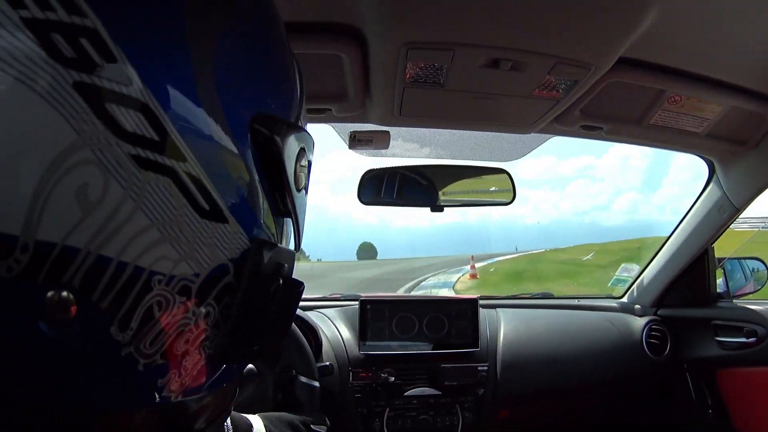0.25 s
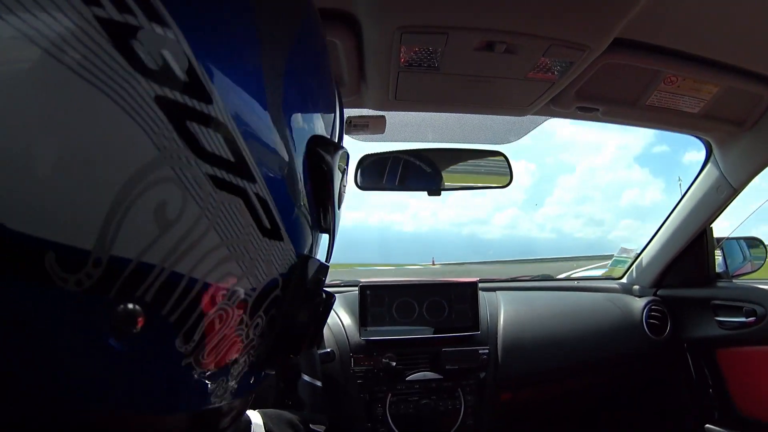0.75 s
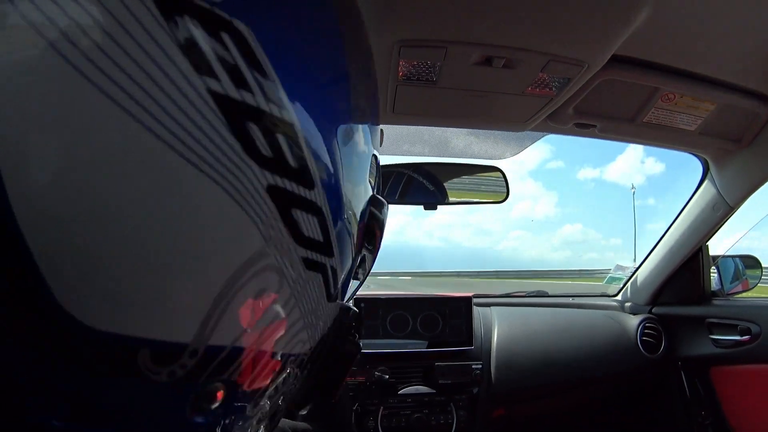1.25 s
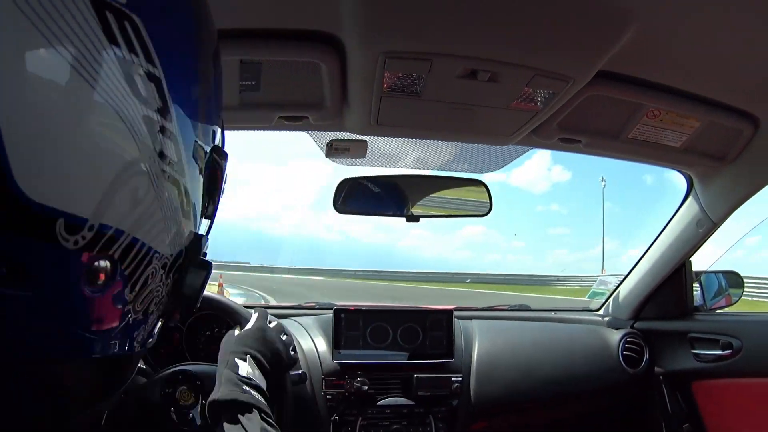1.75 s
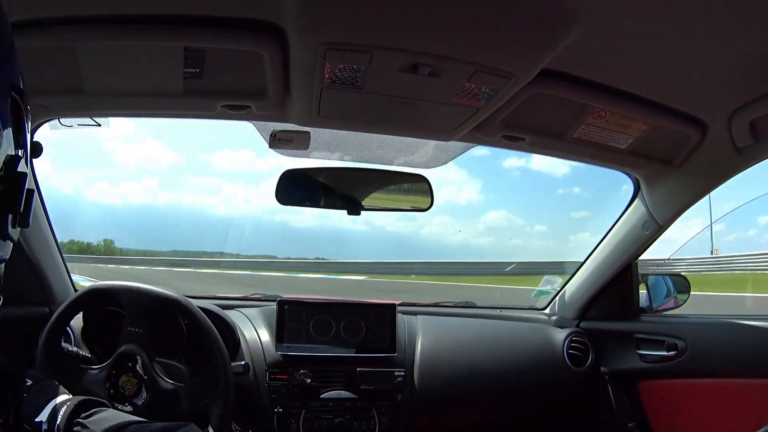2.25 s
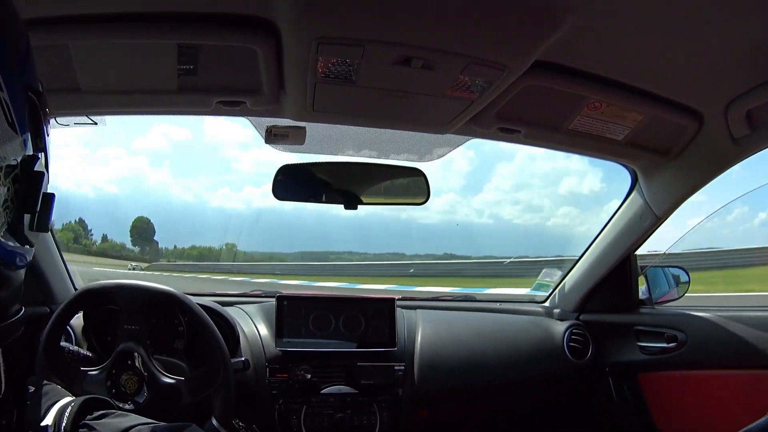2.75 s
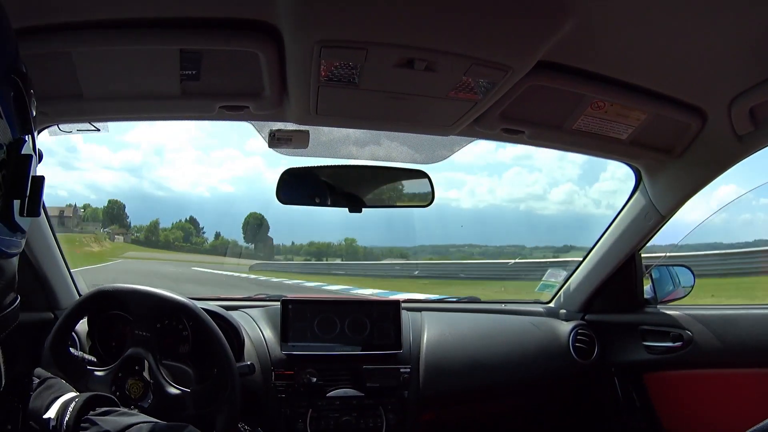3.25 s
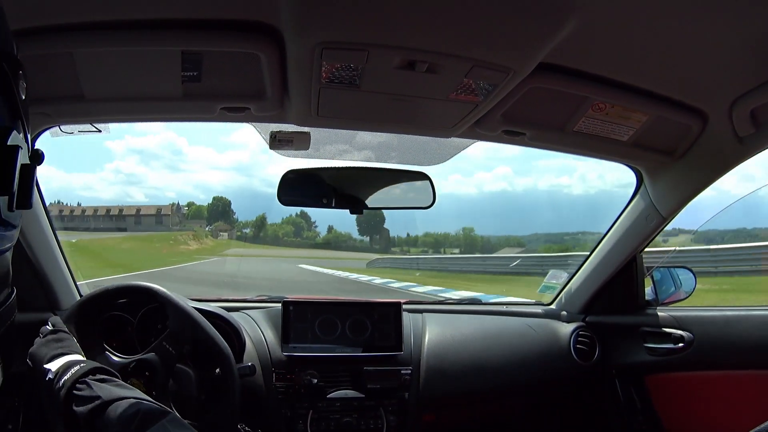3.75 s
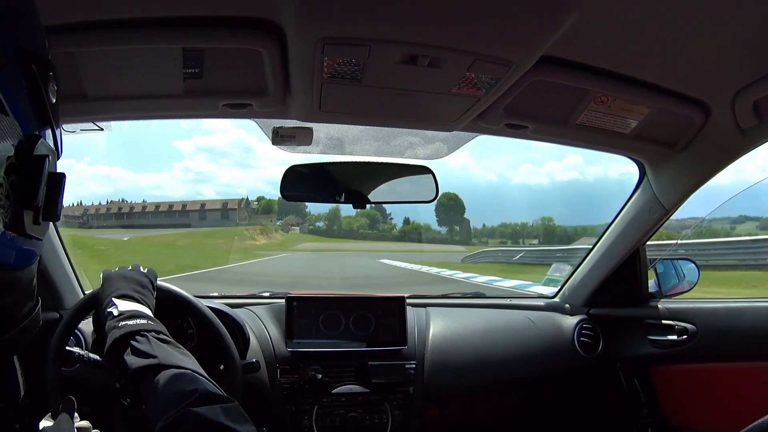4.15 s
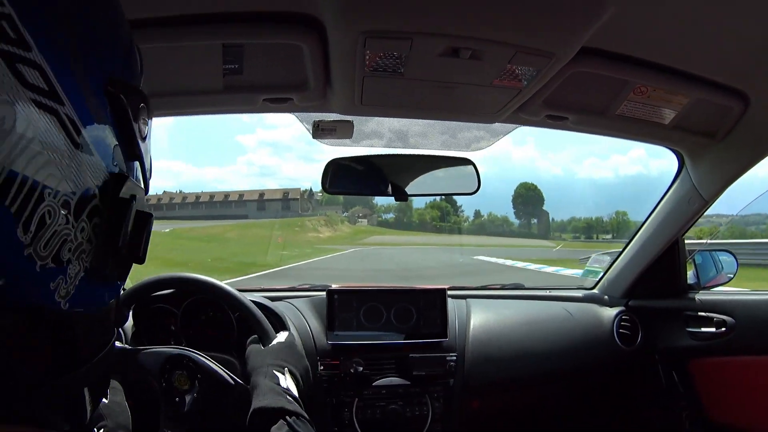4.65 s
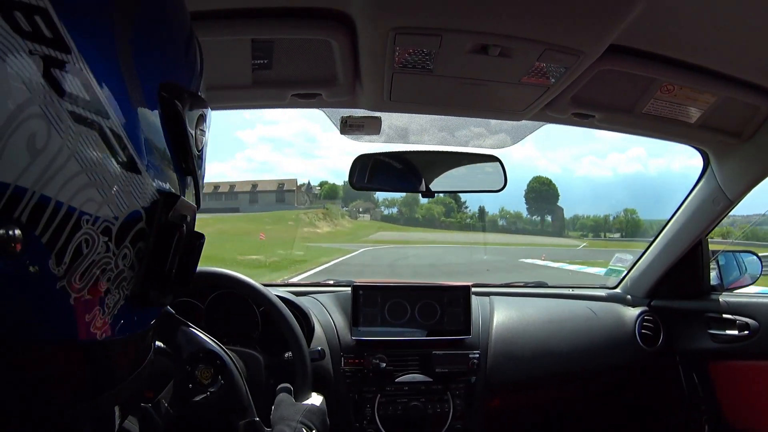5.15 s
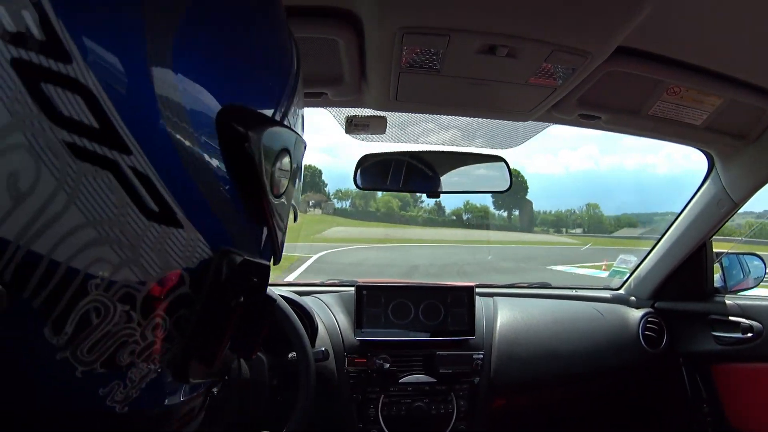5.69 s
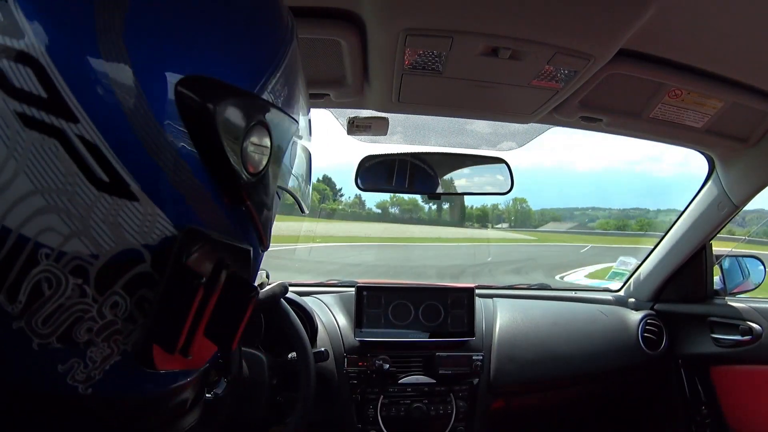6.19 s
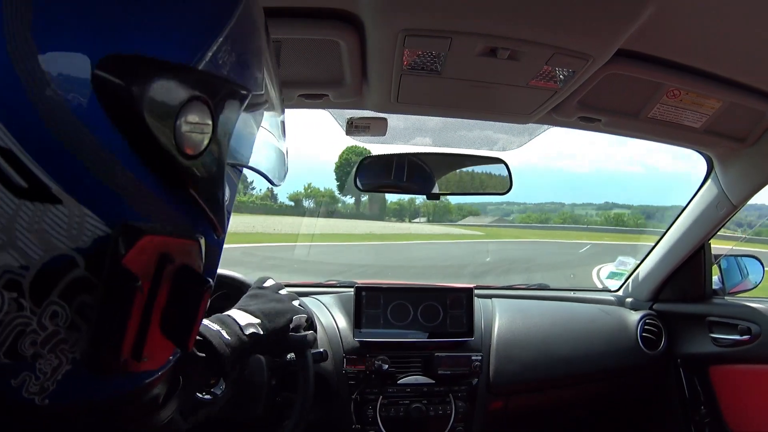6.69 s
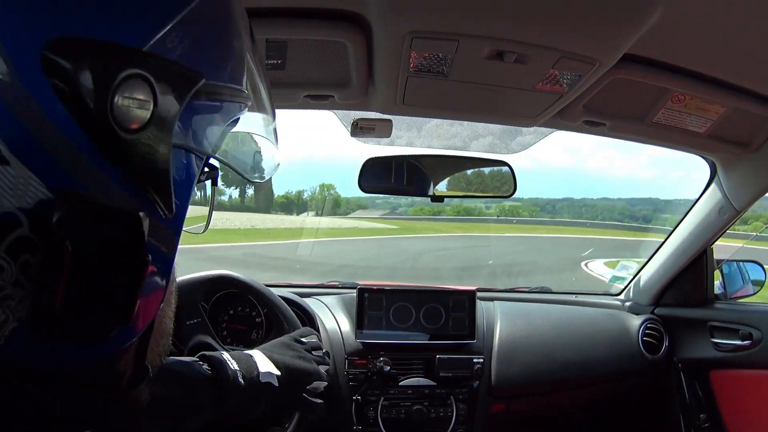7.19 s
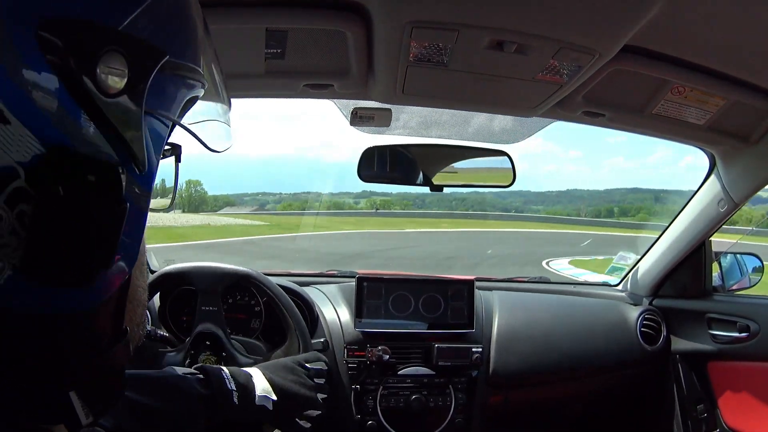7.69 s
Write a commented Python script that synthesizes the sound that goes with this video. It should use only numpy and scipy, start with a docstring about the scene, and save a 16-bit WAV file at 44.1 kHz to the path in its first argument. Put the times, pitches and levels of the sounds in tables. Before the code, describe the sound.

Close, dark cabin sound of a car on a race track. A low buzzing rotary engine sags slightly, then pulls steadily upward over body rumble and tyre roar. Plastic trim clacks and a small metal ring tinkles, mostly around two to three seconds. Just past five seconds the driver lifts: clunks, a shudder and a puff of air, then quieter, falling engine drone with road noise and faint ringing.

```python
"""Cabin of a turbocharged rotary car on a race track: it pulls up through a bend, lifts off and runs down.
Firing boom, lope, overtones and whines are fluttering lines locked to one shaft angle; rasp is pulsed noise.
Body rumble, tyre roar, drivetrain drone and rushing air are coloured noise and lines with timed levels.
Trim knocks, ring taps and drivetrain clunks are decaying bursts and modes; a faint hum climbs late.
Draughts buffet the microphone ports; limiters hold the peaks."""
import sys
import numpy as np
from scipy import signal
from scipy.fft import rfft, irfft, next_fast_len
from scipy.io import wavfile
from scipy.ndimage import uniform_filter1d, minimum_filter1d, map_coordinates

SR = 44100
rng = np.random.default_rng(int(sys.argv[2]) if len(sys.argv) > 2 else 0)


def generate_wav(signal):
    """Clip the signal to [-1, 1] and save it as 16-bit WAV at the path in sys.argv[1]."""
    frames = np.transpose(np.atleast_2d(signal))
    scaled = np.clip(frames, -1, 1) * 32767
    pcm = np.round(scaled).astype(np.int16)
    wavfile.write(sys.argv[1], SR, pcm)


N = 349713
# all table levels are relative: later gains and the limiters still act


def amp(db):
    """Decibels to gain."""
    return 10 ** (np.asarray(db) / 20)


def unit(x):
    """Scaled to rms 1."""
    return x / np.sqrt(np.mean(x ** 2) + 1e-20)


def along(points, hz):
    """(freq_hz, value) points read on a log frequency axis."""
    point_hz, value = np.transpose(points)
    return np.interp(np.log(hz + 1), np.log(point_hz + 1), value)


def curves(rows):
    """One value per sample for each column after time_s; end values hold."""
    time_s, *columns = np.transpose(rows)
    return [np.interp(np.arange(N) / SR, time_s, column) for column in columns]


def wobble(knots_per_s):
    """Smooth random curve."""
    knots = rng.standard_normal(int(N * knots_per_s / SR) + 4)
    return map_coordinates(knots, [np.arange(N) * knots_per_s / SR])


def filtered(x, response):
    """x shaped by a response of frequency, zero-padded against wrap-around."""
    n = x.shape[-1]
    padded = next_fast_len(n + 8192)
    hz = np.fft.rfftfreq(padded, 1 / SR)
    return irfft(rfft(x, padded) * response(hz), padded)[..., :n]


def coloured(x, spectrum):
    """x given a table's spectrum, rms 1."""
    return unit(filtered(x, lambda hz: amp(along(spectrum, hz))))


def noise(spectrum):
    """Mono coloured noise, rms 1."""
    return coloured(rng.standard_normal(N), spectrum)


# stereo width of the noises: freq_hz, side_minus_mid_db
STEREO_WIDTH = [(130, -15), (200, -11.5), (300, -13.5), (450, -11), (670, -10), (1000, -7), (1500, -6),
                (2240, -5.5), (3340, -9.5), (5000, -11.5), (7500, -14), (11200, -16)]


def diffuse(spectrum, ripple_db=1.32, ripple_hz=45):
    """Stereo noise, mid at rms 1; reflections from the glass ripple its colour."""
    def ripple(hz):
        knots = rng.standard_normal(2048)
        depth_db = ripple_db * np.minimum(hz / 1000, 1)
        return depth_db * map_coordinates(knots, [hz / ripple_hz], mode="mirror")

    def colour(hz):
        mid_db = along(spectrum, hz) + ripple(hz)
        side_db = along(spectrum, hz) + along(STEREO_WIDTH, hz) + ripple(hz)
        return amp([mid_db, side_db])

    mid, side = filtered(rng.standard_normal((2, N)), colour)
    return np.array([mid + side, mid - side]) / np.std(mid)


def panned(left_minus_right_db):
    """Left and right gains."""
    return amp([[left_minus_right_db / 2], [-left_minus_right_db / 2]])


def add(track, start_s, sound):
    """Mixes a sound in at start_s, or at 0 if that is negative."""
    start = max(round(start_s * SR), 0)
    track[..., start:start + sound.shape[-1]] += sound[..., :N - start]


def partial(phase, rough, flutter_rate, spread):
    """Stereo line, rms 1: shared flutter (knots/s) plus a share opposed between the ports."""
    shared = 1 + rough * (wobble(flutter_rate) + 1j * wobble(flutter_rate))
    apart = spread * (wobble(3.044) + 1j * wobble(3.3))
    return unit((np.array([shared + apart, shared - apart]) * np.exp(1j * phase)).real)


def resonance(hz, centre_hz, width_hz):
    """Response of one mode, 1 at its centre."""
    return 1j * hz * width_hz / (centre_hz ** 2 - hz ** 2 + 1j * hz * width_hz)


def body(modes):
    """Response of a set of modes: each squared resonance magnitude, scaled and summed."""
    return lambda hz: sum(amp(db) * np.abs(resonance(hz, centre_hz, width_hz)) ** 2
                          for centre_hz, width_hz, db in modes)


def by_throttle(table, hz, throttle):
    """Gains under power and on the overrun, crossfaded by throttle."""
    row_hz, power_db, overrun_db = np.transpose(table)
    power = throttle * amp(np.interp(hz, row_hz, power_db))
    overrun = (1 - throttle) * amp(np.interp(hz, row_hz, overrun_db))
    return power, overrun


# engine speed: time_s, firing_hz
ENGINE_SPEED = [(0, 140.4), (.2, 135.5), (.55, 129.4), (1.0, 128.6), (1.25, 125.5), (2.0, 125.4),
                (2.3, 127.5), (2.7, 127.3), (3.1, 129.6), (3.5, 132.4), (4.0, 137.7), (4.5, 143.1),
                (4.9, 151.6), (5.2, 154.2), (5.6, 146.3), (6.15, 133.9), (6.5, 128.6), (7.4, 123.4)]


def engine_speed():
    """Firing rate in Hz with a slight random unsteadiness."""
    return curves(ENGINE_SPEED)[0] * (1 + .0015 * wobble(12))


# driver feeds in power, floors it, eases, lifts, picks it up again: time_s, throttle (0-1)
PEDAL = [(.6, 0.15), (.85, 0.4), (1.02, 0.77), (2.5, 0.82), (2.66, 0.69), (2.78, 0.91), (4.85, 0.98),
         (5.25, 0.64), (5.4, 0.03), (7.25, 0), (7.45, 0.45), (7.65, 0.8)]


def pedal():
    """Throttle opening per sample."""
    return curves(PEDAL)[0]


# cabin boom, strongest at low firing rates: firing_hz, power_db, overrun_db
CABIN_BOOM = [(123.2, -18, -21), (126, -16, -17), (130.1, -14.5, -20.5), (136.3, -16, -23),
              (143.3, -22.5, -36.5), (156.1, -30, -49)]


def firing_boom(turn, firing_hz, throttle):
    """Combustion pushes where the overrun sucks, so the boom cancels as the throttle passes between."""
    push, suck = by_throttle(CABIN_BOOM, firing_hz, throttle)
    return (push - suck) * partial(turn, rough=0.069, flutter_rate=30, spread=.05) * panned(-0.97)


# uneven firing: firing_hz, power_db, overrun_db
UNEVEN_FIRING = [(119.2, -33, -21.5), (131, -44.5, -25), (143.5, -46, -38.5)]


def lope(turn, firing_hz, throttle):
    """Rotors fire unevenly, chiefly on the overrun: a line at half the firing rate."""
    gain = sum(by_throttle(UNEVEN_FIRING, firing_hz, throttle))
    return gain * partial(turn / 2, rough=.3, flutter_rate=10, spread=.15)


# two rotors fire in turn, unequally, so half orders sound: firing_multiple, level_db
EXHAUST_ORDERS = [(.5, 4.5), (1.5, -9), (2, 5.5), (2.5, 1.5), (3, 3.5), (3.5, 3.5), (4, 2), (4.5, -3),
                  (5, -12.5), (5.5, -6), (6, -16.5), (6.5, -6.5), (7, -8.5), (7.5, -16.5), (8.5, -10.5),
                  (10, -8.5), (11, -12.5)]
# overtones the cabin favours as they pass: freq_hz, gain_db
CABIN_RESPONSE = [(250, 4), (295, 4), (325, -11), (360, 4.5), (385, 0.5), (420, 2.5), (440, -7.5),
                  (465, 1.5), (495, -3.5), (518, -1.5), (535, -4), (562, -1), (582, 4.5), (602, 0),
                  (620, -11.5), (650, -8), (730, 2), (800, -9), (890, -2.5), (1100, -6)]


def exhaust_overtones(turn, throttle, open_db=-25.5, shut_db=-38.5, load_power=2.2):
    """Firing orders through the cabin response; they open up chiefly near full throttle."""
    orders = sum(amp(db) * partial(multiple * turn, rough=0.21, flutter_rate=22, spread=0.26)
                 for multiple, db in EXHAUST_ORDERS)
    level_db = shut_db + throttle ** load_power * (open_db - shut_db)
    return amp(level_db) * coloured(orders, CABIN_RESPONSE)


# gear level, shaped by a cabin standing wave: whine_hz, power_db, overrun_db
GEAR_WHINE = [(199, -33.5, -28.5), (208.3, -44.5, -33), (223.2, -31.5, -26.5), (230.3, -22, -22),
              (239.3, -21, -25), (248, -27.5, -31)]


def gear_whine(turn, firing_hz, throttle, firing_multiple=1.62):
    """A gear sings at a fixed multiple of the firing rate."""
    gain = sum(by_throttle(GEAR_WHINE, firing_multiple * firing_hz, throttle))
    return gain * partial(firing_multiple * turn, rough=0.25, flutter_rate=28, spread=0.14)


def pulley_whine(turn, firing_multiple=1.845, level_db=-33):
    """A pulley stands out as it meets a narrow standing wave of the cabin."""
    line = partial(firing_multiple * turn, rough=0.62, flutter_rate=10, spread=0.23)
    return amp(level_db) * unit(filtered(line, lambda hz: resonance(hz, 230.95, 8.5)))


# rasp level: time_s, level_db
RASP_LEVEL = [(0, -53), (.55, -56.5), (2.7, -61), (4.1, -52), (4.6, -47.5), (5.0, -49), (5.28, -42.5),
              (5.34, -50), (5.8, -42.5), (6.3, -71)]
# rasp colour: freq_hz, density_db
RASP_COLOUR = [(500, -29.5), (1000, -5), (1350, 2.5), (1650, -4.5), (2100, -3.5), (3000, -9), (4500, -16.5),
               (8000, -44)]


def exhaust_rasp(turn):
    """Turbulent gas leaves the ports, surging with the firings and at half their rate."""
    bursts = 1 + 0.26 * np.cos(turn) + 0.23 * np.cos(turn / 2)
    return amp(curves(RASP_LEVEL)[0]) * bursts * diffuse(RASP_COLOUR)


def damped(shake, window_s=.045, damping=.6):
    """Dampers press down the swells of the shaking; lowpassed, mid at rms 1."""
    power = np.abs(uniform_filter1d(np.mean(shake ** 2, axis=0), int(window_s * SR)))
    pressed = shake / (power + 1e-9) ** (damping / 2)
    even = filtered(pressed, lambda hz: 1 / (1 + (hz / 220) ** 8))
    return even / np.std(even.mean(axis=0))


# body shake level: time_s, level_db
SHAKE_LEVEL = [(.42, -20.5), (.56, -15.5), (.9, -15.5), (1.05, -18.5), (1.45, -21.5), (2.25, -20.5),
               (2.45, -14), (2.62, -18.5), (2.75, -22), (3.5, -23.5), (4.0, -20), (4.7, -19.5), (5.3, -17),
               (6.0, -16.5), (6.7, -18.5), (7.93, -15.5)]
# in-phase shake colour: freq_hz, density_db
RUMBLE_COLOUR = [(10, -14), (20, -3), (28, -1.5), (38, 0.5), (50, -6), (62, -7), (78, -9.5), (100, -11),
                 (125, -14.5), (170, -32.5), (300, -83)]
# left-right opposed shake colour: freq_hz, density_db
SWAY_COLOUR = [(15, -17), (30, -12), (50, 5), (65, 14), (80, 4), (95, 6.5), (125, -3.5), (170, -19),
               (300, -76.5)]


def body_rumble():
    """The body shakes: low noise in phase plus a sway opposed left to right."""
    sway = amp(-7) * noise(SWAY_COLOUR) * [[1], [-1]]
    level_db = curves(SHAKE_LEVEL)[0] + .6 * wobble(6.6)
    return amp(level_db) * damped(noise(RUMBLE_COLOUR) + sway)


# tyre roar level, which the rushing air follows: time_s, level_db
ROAD_LEVEL = [(0, -28.5), (.5, -27.5), (.62, -29), (1.0, -29), (1.85, -30.5), (2.05, -27), (2.45, -23.5),
              (2.66, -31), (2.85, -25.5), (3.5, -26.5), (4.6, -27), (5.3, -26), (5.55, -24), (5.83, -22.5),
              (6.3, -23.5), (7.93, -22.5)]
# tyre roar colour: freq_hz, density_db
TYRE_COLOUR = [(70, -31.5), (130, -1), (175, 2), (205, -0.5), (232, 5), (266, -5), (305, -1.5), (350, -7.5),
               (420, -9.5), (520, -12), (610, -14), (680, -13.5), (755, -11), (810, -16), (890, -13.5),
               (1050, -20.5), (1500, -26.5), (2200, -36.5), (4000, -45), (9000, -67.5)]


def tyre_roar():
    """Tyres roar over the asphalt: diffuse noise with a fluctuating level."""
    level_db = curves(ROAD_LEVEL)[0] + 0.44 * wobble(25)
    return amp(level_db) * diffuse(TYRE_COLOUR) * panned(0.88)


# drone level: time_s, level_db
DRONE_LEVELS = [(0, -29), (.48, -35.5), (.72, -41), (.95, -38.5), (1.15, -38), (1.68, -34), (1.84, -53),
                (2.02, -35.5), (2.45, -46), (3.6, -36.5), (4.35, -35), (4.62, -49), (5.0, -36),
                (5.5, -32.5), (6.2, -26.5), (6.6, -30), (7.35, -28.5), (7.77, -33), (7.93, -23.5)]
# drone colour: freq_hz, density_db
DRONE_COLOUR = [(200, -57.5), (360, -6.5), (410, 2), (480, 2), (510, -5), (560, -17.5), (900, -63.5)]
# droning shafts: firing_multiple, level_db
DRONE_SHAFTS = [(3.35, -5), (3.72, -0.5), (3.88, 0)]


def drivetrain_drone(turn):
    """Drivetrain shafts drone as rough lines, blended with noise of the same colour."""
    shafts = sum(amp(db) * partial(multiple * turn, rough=0.53, flutter_rate=15, spread=0.62)
                 for multiple, db in DRONE_SHAFTS)
    blend = coloured(shafts, DRONE_COLOUR) + 0.68 * diffuse(DRONE_COLOUR)
    return amp(curves(DRONE_LEVELS)[0]) * blend * panned(1.1)


# rushing air colour: freq_hz, density_db
AIR_COLOUR = [(600, -14), (1400, 8.5), (2200, 3.5), (2900, 2), (3400, -1.5), (4200, 0), (5400, -3),
              (6300, -8), (7500, -14.5), (9500, -14.5), (11200, -18.5)]


def rushing_air(turn, below_tyres_db=21, swell_s=2.02, swell_width_s=0.34, swell_db=3):
    """Air hiss follows the road level, swells once and pulses with the firings."""
    swell = np.exp(-((np.arange(N) / SR - swell_s) / swell_width_s) ** 2)
    level_db = curves(ROAD_LEVEL)[0] - below_tyres_db + swell_db * swell + 0.56 * wobble(40)
    pulsing = 1 + 0.058 * np.cos(turn) + 0.061 * np.cos(turn / 2)
    return amp(level_db) * pulsing * diffuse(AIR_COLOUR) * panned(0.99)


# loose trim knocks, and at 4.348 s a sharp click as a draught strikes: start_s, level_db, knock_db, centre_hz,
# left_minus_right_db, note_hz, note_db
TRIM_KNOCKS = [(0.0223, -29, -1, 3142, 1, 3000, -13), (0.317, -22.5, -5, 3160, 2.5, 3020, -14),
               (0.919, -31, 6, 2534, 0, 2500, -8), (1.0994, -25, -3, 2800, 0.5, 2260, -10),
               (1.7554, -24, -1, 2800, 1, 2740, -7), (1.9917, -31, -9, 3600, 1.5, 4000, -10),
               (2.1452, -16.5, 2, 3200, -3, 3060, -7), (2.206, -19, 6.5, 2900, -2, 700, 6),
               (2.2585, -22.5, -6, 4200, -3, 3990, -3), (2.443, -34, -4, 3000, 0, 2260, -4),
               (2.625, -30.5, -1, 3497, 0, 3030, -9), (4.348, -22.5, 3, 2880, 0, 2240, -12),
               (6.9727, -34, 10, 2393, 0, 698.6, 10)]
# panel modes: centre_hz, width_hz, level_db
PANEL_MODES = [(710, 150, 6.5), (1130, 670, -2), (2100, 870, -2.5), (3220, 470, -6.5), (4050, 190, -0.5),
               (5000, 400, -0.5), (5820, 580, -0.5), (6400, 480, -3.5), (9200, 3500, -3.5)]


def trim_knocks(octaves=0.68, t60_s=.042, note_t60_s=.07, attack_s=.0006, bounce_s=.005):
    """Plastic panels strike and bounce once: bright clack, duller knock and the panel's own note; the click at
    4.348 s is played the same way."""
    out, t = np.zeros((2, N)), np.arange(SR // 8) / SR

    def strike(t, t60_s):
        return amp(-60 * t / t60_s) * (1 - np.exp(-t / attack_s))

    fade = strike(t, t60_s) + 0.23 * strike(np.maximum(t - bounce_s, 0), t60_s)
    for start_s, db, knock_db, centre_hz, pan_db, note_hz, note_db in TRIM_KNOCKS:
        blow = rng.standard_normal(len(t)) + 0.64 * rng.standard_normal((2, len(t)))
        burst = filtered(blow, body(PANEL_MODES))
        clack = unit(filtered(burst, lambda hz: 1 / (1 + (np.log2((hz + 1) / centre_hz) / octaves) ** 2)))
        knock = unit(filtered(burst, lambda hz: 1 / (1 + (hz / 1100) ** 3)))
        note = amp(db + note_db) * strike(t, note_t60_s) * np.sin(2 * np.pi * note_hz * t)
        hit = fade * (amp(db - 3) * clack + amp(db + knock_db - 1.5) * knock)
        add(out, start_s, panned(pan_db) * (hit + note))
    return out


# puffs on the microphone ports: start_s, length_s, level_db
DRAUGHT_PUFFS = [(0.217, 0.017, -7.5), (4.347, 0.015, 1), (4.352, 0.064, -8), (4.934, 0.031, -1),
                 (5.343, 0.062, -14), (5.456, 0.044, 6), (5.492, 0.038, 1)]
# buffeting colour: freq_hz, density_db
BUFFET_COLOUR = [(30, -4), (100, -2.5), (200, -1), (450, -9), (700, -17.5), (1200, -30), (2200, -41),
                 (3500, -53), (8000, -78)]


def draughts():
    """Short puffs of air push the two ports in opposite directions."""
    push = np.zeros(N)
    for start_s, length_s, db in DRAUGHT_PUFFS:
        add(push, start_s, amp(db) * signal.windows.tukey(max(int(length_s * SR), 2), .5))
    return amp(0.5) * push * noise(BUFFET_COLOUR) * [[1], [-1]]


# clear taps on the ring: start_s, level_db, ring_share (of the free t60)
RING_TAPS = [(0.391, -38.5, 0.69), (1.3064, -46, .9), (1.9571, -36, .6), (2.015, -36, 1),
             (2.0688, -33.5, .9), (2.1989, -33, 1.3), (2.236, -27.5, 1), (2.42, -38, .9),
             (2.4615, -37, 1.58), (2.6282, -22, .8), (2.736, -34.5, .9), (2.8913, -41, .9),
             (2.93, -21.5, 0.91), (3.01, -43, 1), (3.047, -44, 0.84), (4.5574, -36.5, 0.91),
             (4.605, -46, 0.71), (5.0469, -34, 0.99), (5.0855, -36, 0.72), (5.2445, -38, .5),
             (5.6665, -38, 0.63), (5.69, -32, 1.1), (5.7894, -34, 0.53), (5.9148, -34, 0.32),
             (5.953, -34, 1.2), (6.261, -26.5, 0.77), (6.4128, -39, 0.44), (6.7263, -37, .35),
             (6.794, -34, .9), (7.155, -42.5, 1.1)]
# spells of faint trembling: start_s, end_s
TREMBLE_SPELLS = [(1.8, 3.1), (4.55, 5.25), (5.6, 7.2)]


def ring_contacts(light_share=0.52, count=2, flight_s=0.022, loss_db=15,
                  gap_s=0.09, faint_db=-50, scatter_db=1):
    """(start_s, level_db, ring_share) of clear taps, weaker chatter after each, and uneven faint touches."""
    contacts = list(RING_TAPS)
    for start_s, db, _ in RING_TAPS:
        for k in range(count):
            later_s = start_s + flight_s * (k + rng.uniform(0.34, 1))
            contacts.append((later_s, db - loss_db * (k + 1), light_share))
    for spell_start_s, spell_end_s in TREMBLE_SPELLS:
        for slot_s in np.arange(spell_start_s, spell_end_s, gap_s):
            touch_s = slot_s + gap_s * rng.uniform(-1, 1)
            contacts.append((touch_s, faint_db + scatter_db * rng.standard_normal(), light_share))
    return contacts


# ring modes: freq_hz, level_db, t60_s (free)
RING_MODES = [(8040, -12, 0.09), (8210, -10, 0.12), (8460, -2.5, 0.068), (10406, -2, 0.096)]


def ring_jingle(tick_db=-6, tick_t60_s=0.039, scatter_db=3, scatter_hz=16, attack_s=.001):
    """A small hanging metal ring is tapped; each contact redraws mode strengths and pitches, plus a noise tick."""
    out, t = np.zeros((2, N)), np.arange(SR // 4) / SR
    mode_hz, mode_db, t60_s = np.transpose(RING_MODES)[:, :, None]
    attack = 1 - np.exp(-t / attack_s)
    for start_s, db, share in ring_contacts():
        start_db = mode_db + scatter_db * rng.standard_normal(mode_hz.shape)
        strength = amp(start_db - 60 * t / (share * t60_s))
        phase = 2 * np.pi * rng.random(mode_hz.shape) + 0.23 * rng.standard_normal((2, len(RING_MODES), 1))
        pitch_hz = mode_hz + scatter_hz * rng.standard_normal(mode_hz.shape)
        ring = (strength * np.sin(2 * np.pi * pitch_hz * t + phase)).sum(axis=1)
        tick = amp(tick_db - 60 * t / (share * tick_t60_s)) * rng.standard_normal(len(t))
        add(out, start_s, amp(db - 2.0) * attack * (ring + tick))
    return out * panned(1.4)


# drivetrain takes up its slack: start_s, level_db, t60_s
DRIVETRAIN_CLUNKS = [(5.309, -14.5, 0.05), (5.345, -19, 0.04), (5.3694, -10.5, 0.042), (5.469, -14, 0.031)]
# modes of the mounts: centre_hz, width_hz, level_db
MOUNT_MODES = [(340, 220, 10), (700, 260, 3), (1027, 220, -1.5), (1590, 670, -14), (3000, 1600, -20)]
# body shudder level: time_s, level_db
SHUDDER_LEVEL = [(5.0, -60), (5.15, -31), (5.27, -20), (5.34, -10), (5.375, -18), (5.44, -34),
                 (5.465, -18.5), (5.5, -28), (5.55, -58)]


def lift_off(attack_s=0.0022, shudder_hz=105, shudder_width_hz=35):
    """Throttle closes: the drivetrain clunks on its mounts and the body shudders in two swells."""
    out, t = np.zeros((2, N)), np.arange(SR // 8) / SR
    attack = 1 - np.exp(-t / attack_s)
    for start_s, db, t60_s in DRIVETRAIN_CLUNKS:
        blow = rng.standard_normal(len(t)) + 0.74 * rng.standard_normal((2, len(t)))
        clunk = unit(filtered(blow, body(MOUNT_MODES)))
        add(out, start_s, amp(db + 2 - 60 * t / t60_s) * attack * clunk)
    shudder = unit(filtered(rng.standard_normal(N), body([(shudder_hz, shudder_width_hz, 0)])))
    return out + amp(curves(SHUDDER_LEVEL)[0]) * shudder


# faint climbing hum, perhaps another car: time_s, pitch_hz, level_db
HUM_CLIMB = [(5.6, 289, -61), (5.9, 291, -37), (6.5, 309.6, -37), (7.0, 320.3, -44), (7.4, 329, -37),
             (7.93, 338.8, -35)]


def climbing_hum():
    """A weak note with its octave, rising while the engine runs down."""
    pitch_hz, level_db = curves(HUM_CLIMB)
    phase = 2 * np.pi * np.cumsum(pitch_hz) / SR
    note, octave = [partial(k * phase, rough=0.17, flutter_rate=15, spread=0.2) for k in (1, 2)]
    return amp(level_db) * (note + amp(-9) * octave)


def ring_ping(start_s=6.262, pitch_hz=2934, level_db=-37, t60_s=.3):
    """One tap also wakes a low, longer-ringing mode of the metal ring."""
    out, t = np.zeros(N), np.arange(SR // 3) / SR
    add(out, start_s, amp(level_db - 60 * t / t60_s) * np.sin(2 * np.pi * pitch_hz * t))
    return out


# driving level: raised before the lift, dips briefly, settles at 0 dB: time_s, gain_db
DRIVING_LEVEL = [(5.31, 8), (5.38, -3), (5.395, -11), (5.43, -1), (5.47, 0)]


def scene():
    """Everything in the cabin, one shaft angle for all that the engine drives."""
    firing_hz = engine_speed()
    throttle = pedal()
    turn = 2 * np.pi * np.cumsum(firing_hz) / SR
    engine = firing_boom(turn, firing_hz, throttle) + lope(turn, firing_hz, throttle)
    engine = engine + exhaust_overtones(turn, throttle) + exhaust_rasp(turn)
    engine = engine + gear_whine(turn, firing_hz, throttle) + pulley_whine(turn)
    road = body_rumble() + tyre_roar() + drivetrain_drone(turn) + rushing_air(turn)
    driving = amp(curves(DRIVING_LEVEL)[0]) * (engine + road)
    knocks = trim_knocks() + draughts() + ring_jingle() + ring_ping()
    return driving + knocks + lift_off() + climbing_hum()


def limited(x, ceiling, hold_s):
    """Limiter: gain falls just ahead of each peak and stays down for about hold_s."""
    hold = max(int(hold_s * SR), 200)
    needed = np.minimum(1, ceiling / (np.abs(x) + 1e-9))
    held = minimum_filter1d(needed, hold, origin=hold // 2 - 100)
    return x * uniform_filter1d(held, size=200)


def record(dry, top_hz=11250):
    """Mid and side are limited apart; peaks clip, and the top is cut off steeply."""
    mid = limited((dry[0] + dry[1]) / 2, ceiling=.57, hold_s=.025)
    side = limited((dry[0] - dry[1]) / 2, ceiling=1.0, hold_s=.06)
    clipped = np.clip([mid + side, mid - side], -1, 1)
    return filtered(clipped, lambda hz: 1 / np.sqrt(1 + (hz / top_hz) ** 160))


dry = scene()
out = record(dry)
generate_wav(out)
```